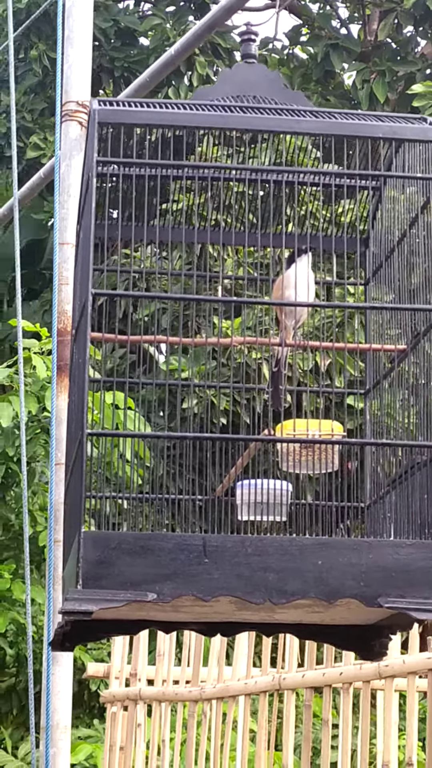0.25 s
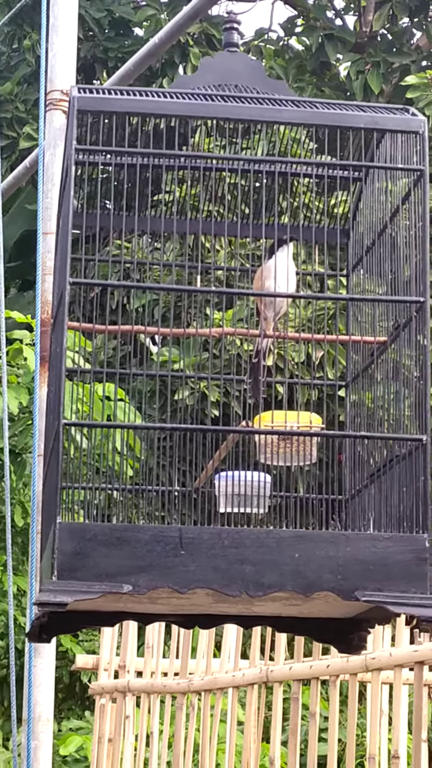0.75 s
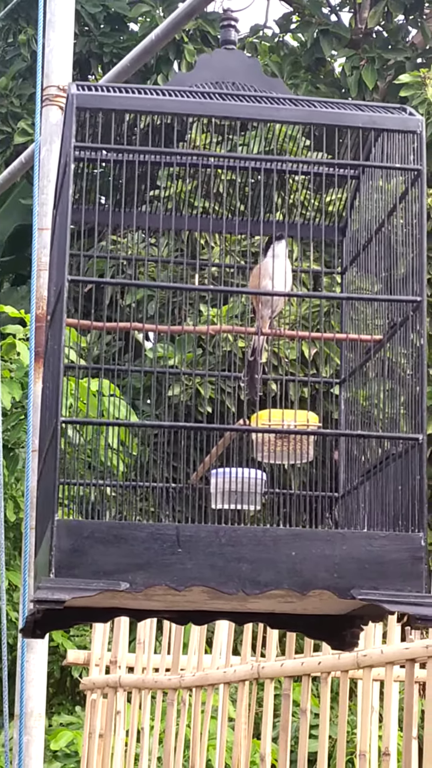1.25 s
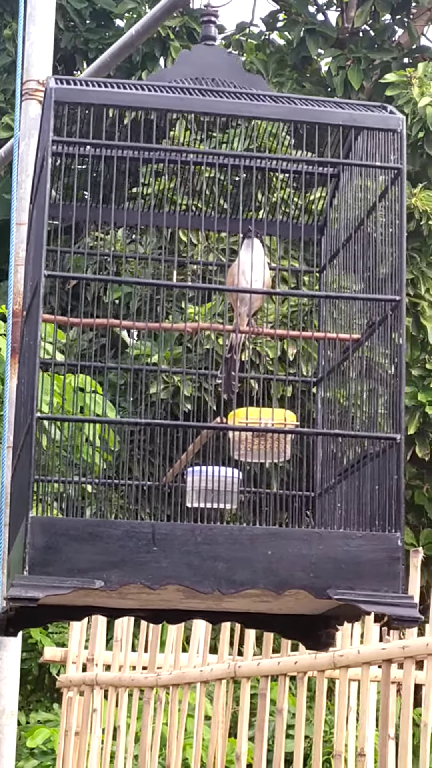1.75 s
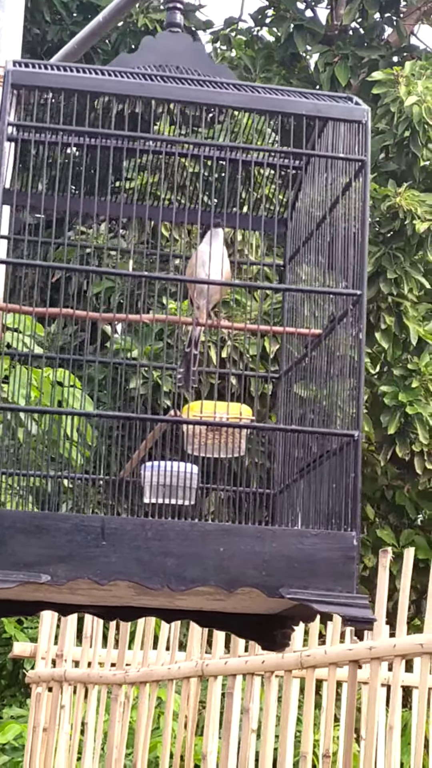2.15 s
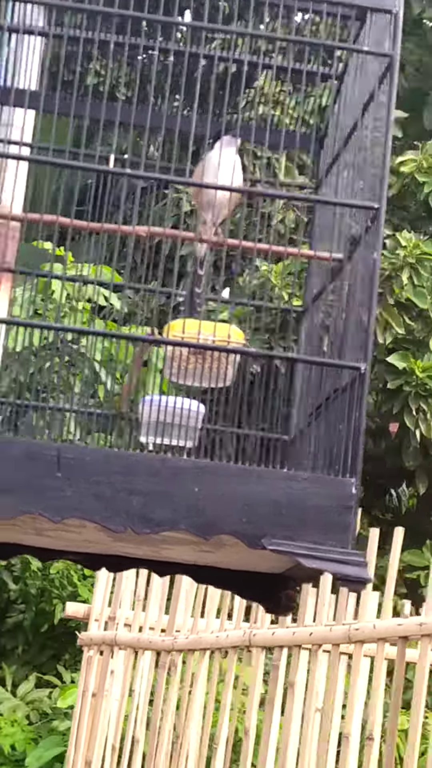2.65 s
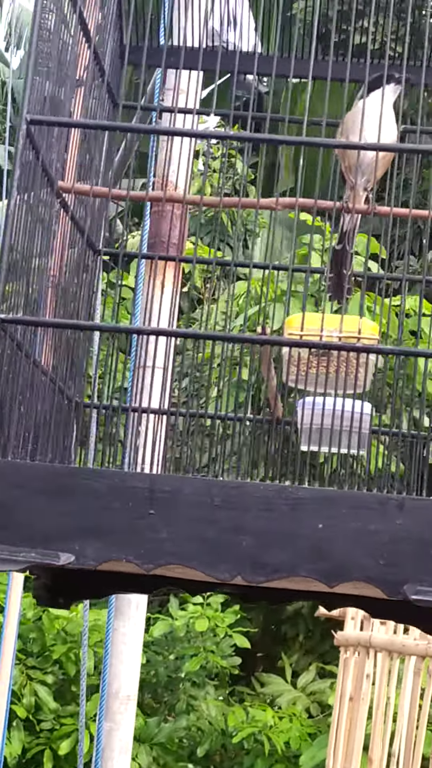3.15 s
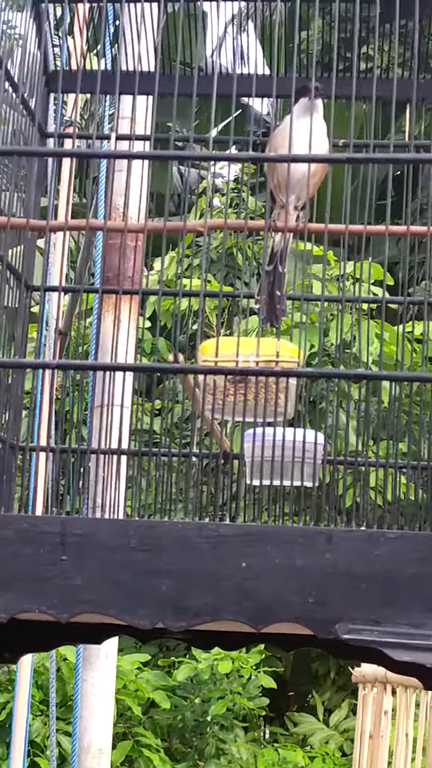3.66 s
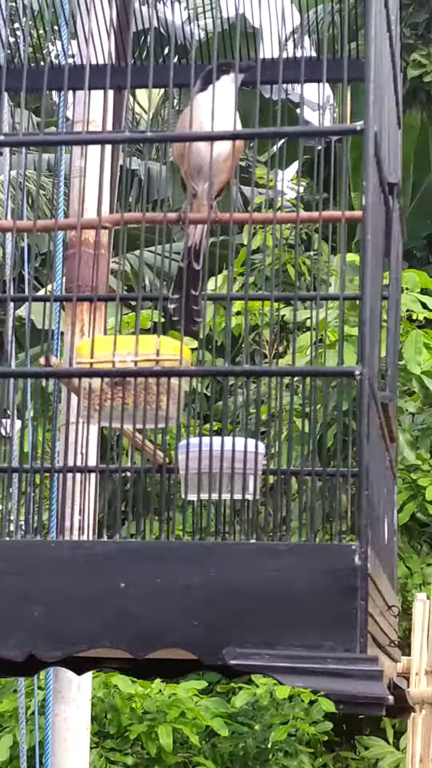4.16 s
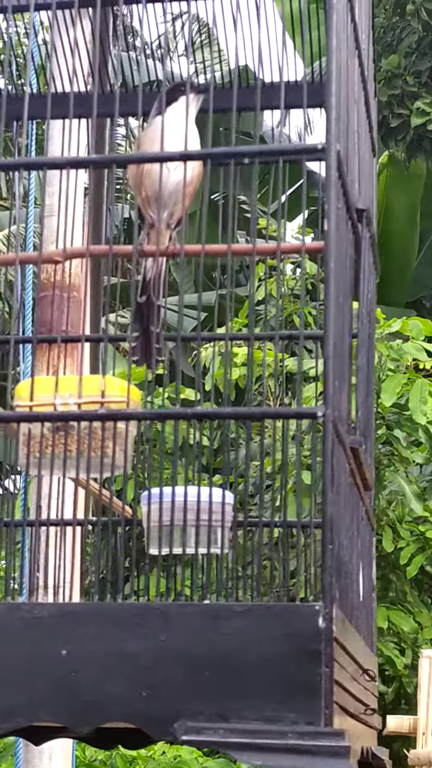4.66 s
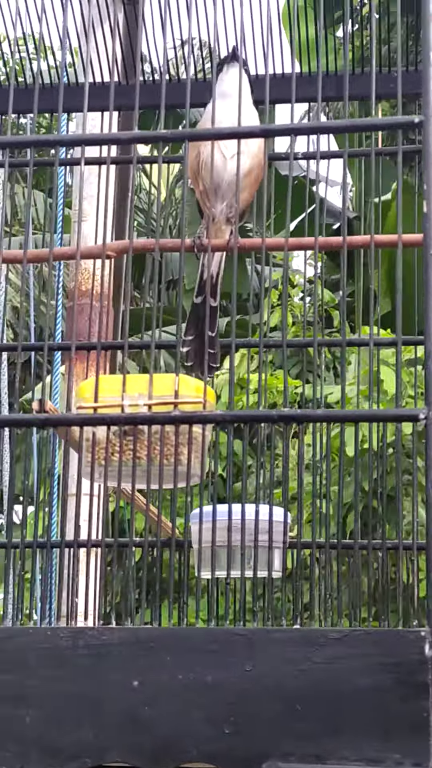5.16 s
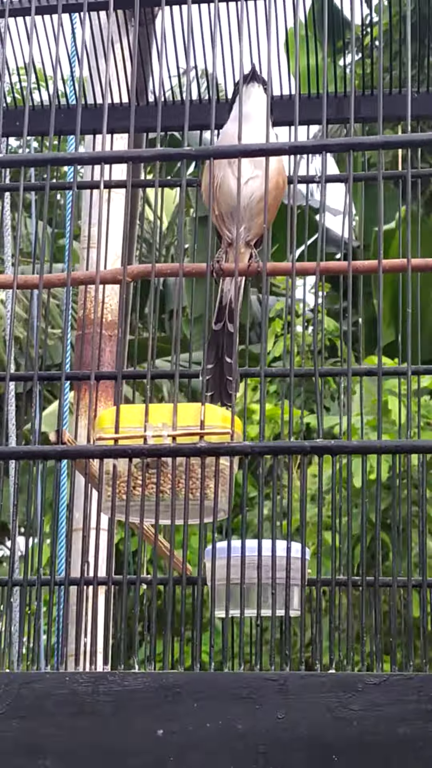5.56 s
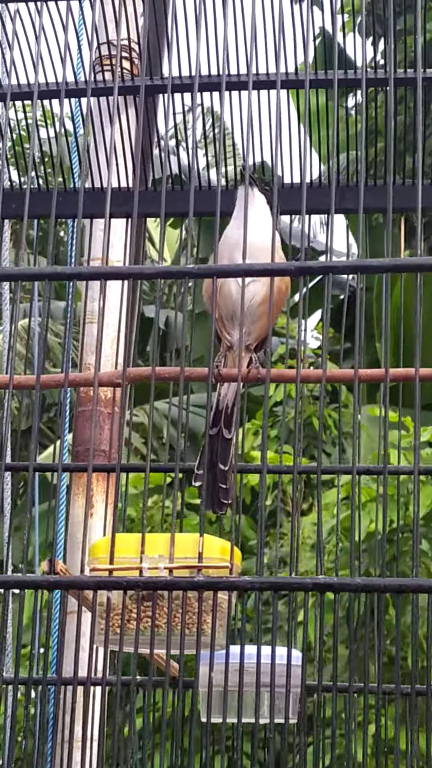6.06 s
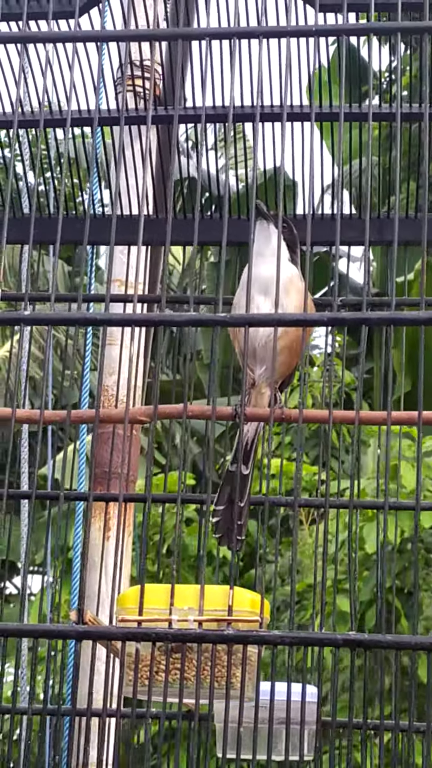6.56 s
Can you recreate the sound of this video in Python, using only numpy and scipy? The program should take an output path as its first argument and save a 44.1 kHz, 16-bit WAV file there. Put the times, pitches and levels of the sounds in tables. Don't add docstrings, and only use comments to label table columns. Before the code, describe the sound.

A caged songbird close by gives a steady run of sharp rasping chips, then buzzy rattles and falling whistles, with dry snaps over faint garden hum.

```python
import sys
import numpy as np
from scipy import signal
from scipy.fft import rfft, irfft, next_fast_len
from scipy.io import wavfile
from scipy.ndimage import uniform_filter1d

SR = 44100
rng = np.random.default_rng(int(sys.argv[2]) if len(sys.argv) > 2 else 0)


def master_out(mix):
    frames = np.transpose(np.atleast_2d(mix))
    ceiling = np.clip(frames, -1, 1)
    pcm = np.round(ceiling * 32767).astype(np.int16)
    wavfile.write(sys.argv[1], SR, pcm)


def invert_db(x):
    u = np.asarray(x, float) / 20
    return 10 ** u


N = 300321


def evened(x):
    return x / np.sqrt(np.mean(x ** 2) + 1e-20)


def read(points, hz):
    f, value = np.transpose(points)
    return np.interp(np.log(hz + 1), np.log(f + 1), value)


def add(mix, start_s, sound):
    part = mix[round(start_s * SR):][:len(sound)]
    part += sound[:len(part)]


def resonate(x, hz, width_hz):
    turn = np.exp(2j * np.pi * hz * np.arange(len(x)) / SR)
    r = np.exp(-np.pi * width_hz / SR)
    return 2 * (turn * signal.lfilter([1 - r], [1, -r], x / turn)).real


def resonate_twice(x, hz, width_hz):
    return resonate(resonate(x, hz, width_hz), hz, width_hz)


def wobble(size, hz):
    lowpass = signal.butter(4, 2 * hz / SR, output="sos")
    return evened(signal.sosfilt(lowpass, rng.standard_normal(size + 500))[500:])


# frequency in Hz, level in dB per Hz.
AIR_SPECTRUM = [(24, -36.5), (40, -2.5), (64, -4), (121, -11), (269, -20), (392, -20.5), (444, -24),
                (663, -27.5), (873, -31), (2320, -30.5), (2700, -33), (5180, -33), (7360, -37),
                (11600, -36), (16000, -45)]
# frequency in Hz, correlation from -1 to 1.
AIR_LIKENESS = [(60, 1), (180, 0.9804), (550, 0.82), (1650, 0.2358), (4970, -0.54), (15000, 0.3101)]
# frequency in Hz, left minus right in dB.
AIR_BALANCE = [(60, -0.5), (180, 1.5), (550, -2.5), (1650, 3.5), (4970, 2), (15000, 1.5)]
# frequency in Hz, width in Hz, level in dB.
ENGINES = [
    (73.3, 42, -58.5),
    (100.24, 6.7, -58),
    (125.32, 24, -62.5),
]


def air():
    hz = np.fft.rfftfreq(1024, 1 / SR)
    a, b, c, d, patches = rng.standard_normal((N // 256 + 5, 513, 5)).T
    patches = evened(uniform_filter1d(uniform_filter1d(patches, 10, 0), 16, 1))
    same = np.clip(read([(35, 1.0)] + AIR_LIKENESS, hz), -1, .9)[:, None]
    left = a + 1j * b
    right = same * left + np.sqrt(1 - same ** 2) * (c + 1j * d)
    balance = invert_db(read(AIR_BALANCE, hz) / 2)[:, None]
    level = invert_db(read(AIR_SPECTRUM, hz)[:, None] + 2.8428 * patches)
    z = np.array([left * balance, right / balance]) * level
    wash = invert_db(-56) * evened(signal.istft(z, nperseg=1024, noverlap=768)[1][:, :N])
    hum = sum(invert_db(db) * evened(resonate_twice(rng.standard_normal(N), f, width_hz)) for f, width_hz, db in ENGINES)
    return wash + hum


def glide(length_s, db, first_hz, last_hz):
    hz = np.linspace(first_hz, last_hz, round(length_s * SR))
    hz = hz * (1 + 0.01616 * wobble(len(hz), hz=57))
    return invert_db(db) * np.sin(2 * np.pi * np.cumsum(hz) / SR) * signal.windows.tukey(len(hz), .5)


# start in seconds, length in seconds, level in dB, pitch in Hz.
DOVE_COOS = [
    (.02, 0.06286, -64, 698.4),
    (.211, 0.4844, -73, 699.4),
    (.501, 0.2615, -69, 600),
    (1.81, 0.273, -71, 683),
    (2.601, 0.1224, -66, 682.9),
    (4.28, 0.4848, -73, 538.3),
    (6.486, .11, -58, 697),
    (6.767, 0.0441, -62, 675.9),
]
# middle in seconds, spread in seconds, rise over the murmur in dB.
DOVE_BOUTS = [
    (.45, .4, 12),
    (2.05, .12, 4),
    (2.67, .2, 10.5),
    (3.9, .15, 0.5),
    (6.5, .3, -7.5),
]


def doves():
    out = np.zeros(N)
    for start_s, length_s, db, hz in DOVE_COOS:
        add(out, start_s, glide(length_s, db, hz, 0.95475 * hz))
    t = np.arange(N) / SR
    bouts_db = sum(db * np.exp(-((t - s) / spread_s) ** 2) for s, spread_s, db in DOVE_BOUTS)
    murmur_db = -81 + bouts_db + 3 * wobble(N, hz=3.9)
    return out + invert_db(murmur_db) * evened(resonate_twice(rng.standard_normal(N), 660, 390))


# start in seconds, length in seconds, level in dB, first pitch in Hz, last pitch in Hz.
FAR_NOTES = [
    (0.344, 0.0992, -73, 4250, 4050),
    (0.426, 0.1561, -72, 5100, 4550),
    (0.967, 0.1808, -65.5, 4400, 4520),
    (1.117, 0.03209, -62.5, 4350, 3900),
    (4.032, 0.12102, -68, 2350, 2250),
    (4.42, 0.10005, -67, 2500, 2150),
    (5.7, 0.18, -69.5, 5150, 4450),
    (6.233, 0.03004, -68, 4250, 4450),
    (6.301, 0.091, -67, 4550, 4350),
]


def far_birds():
    out = np.zeros(N)
    for start_s, *note in FAR_NOTES:
        add(out, start_s, glide(*note))
    return out


# start in seconds, level in dB, decay length in seconds, centre in Hz.
TICK_EVENTS = [(0.484, -59, 0.01994, 1555), (0.491, -52.5, 0.01052, 300), (0.845, -46.5, 0.01187, 350.5),
               (2.797, -53.5, 0.1292, 45), (0.747, -64.5, 0.01059, 2976), (0.847, -62.5, 0.01309, 1150),
               (0.871, -58.5, 0.01088, 2500), (2.148, -58, 0.04305, 482.9), (2.626, -50.5, 0.0284, 4170),
               (2.63, -41, 0.00805, 11260), (3.788, -59.5, 0.2103, 7430), (3.295, -46.5, 0.003635, 1624),
               (3.788, -61.5, 0.1736, 935.2), (4.645, -49, 0.01456, 2000), (5.539, -39, 0.004579, 1840),
               (5.552, -47, 0.014, 3480), (5.589, -50.5, 0.0085, 1850), (5.61, -57.5, .003, 1880),
               (5.617, -56, 0.0037, 1717), (5.635, -53.5, 0.0071, 1800), (5.805, -49.5, 0.003, 2500)]


def ticks():
    out = np.zeros(N)
    for start_s, db, length_s, hz in TICK_EVENTS:
        t = np.arange(round(3 * length_s * SR)) / SR
        noise = evened(resonate(rng.standard_normal(len(t)), hz, 0.68 * hz))
        add(out, start_s, invert_db(db) * noise * np.exp(-t / length_s))
    return out


def small_sounds():
    out = doves() + far_birds() + ticks()
    return np.array([invert_db(-1.0) * np.roll(out, 9), invert_db(-5.0) * out])


# frequency in Hz, gain in dB.
BEAK_GAIN = [(1500, -5), (4000, -3.5), (7000, -1.5), (9500, -7), (10600, -10.5), (12000, 9.5),
             (14500, -3.5), (16500, -11)]


def voice(rows, overtones_db, fade=0.09):
    s, *columns = np.transpose(rows)
    t = np.arange(s[0], s[-1], 1 / SR)
    effort_db, hz, rough = (np.interp(t, s, c) for c in columns)
    rough = np.clip(rough, 0, .3)
    throb = np.cos(2 * np.pi * np.cumsum(260 * (1 + 0.32 * wobble(len(t), hz=115.77))) / SR)
    dip = (throb - .3) * (1 + 0.27 * np.tanh(wobble(len(t), hz=84.52)))
    turns = np.cumsum(hz * (1 + rough * dip + 0.0033 * wobble(len(t), hz=150.2))) / SR
    strength = invert_db(effort_db + 1.5) * (1 + np.minimum(5.9 * rough, .6) * wobble(len(t), hz=300))
    slack_db = fade * (effort_db - effort_db.max())
    stack = 0
    for k, db in enumerate(overtones_db, 1):
        level = invert_db(db + (k > 1) * slack_db + read(BEAK_GAIN, k * hz)) * (k * hz < 17000)
        stack = stack + level * np.sin(2 * np.pi * k * turns)
    return s[0], strength * stack * signal.windows.tukey(len(t), min(1, 120 / len(t)))


def curve_note(curve, rough, overtones_db):
    return voice([(*row, rough) for row in curve], overtones_db)


# time in seconds, effort in dB, pitch in Hz.
PLUNGE_CURVE = [(1.207, -37.5, 4867), (1.225, -35, 4810), (1.262, -25, 4270), (1.275, -25, 3744),
                (1.295, -34.5, 2500), (1.315, -34.5, 1897), (1.33, -49, 1579)]
UNDER_CURVE = [(1.207, -41.5, 2743), (1.222, -44.5, 3306), (1.255, -41, 3043), (1.272, -47.5, 3543)]
HOARSE_CURVE = [(1.207, -50, 2300), (1.265, -47.5, 2472), (1.3, -58, 2144)]
CLIMB_CURVE = [(1.441, -30.5, 5512), (1.449, -38.5, 4280), (1.466, -30, 4951), (1.482, -22.5, 5100),
               (1.488, -26.5, 6083), (1.515, -28.5, 6100)]
CLEAR_STACK_DB = [-1, -19.5, -23, -47, -36.5]
HOARSE_STACK_DB = [-20.5, 5, 5.5, -5, -10.5, -16]


def opening_notes():
    return [curve_note(PLUNGE_CURVE, .025, CLEAR_STACK_DB), curve_note(UNDER_CURVE, .04, CLEAR_STACK_DB),
            curve_note(HOARSE_CURVE, .14, HOARSE_STACK_DB), curve_note(CLIMB_CURVE, .075, CLEAR_STACK_DB)]


# start in seconds, peak in dB, bass in dB, bass frequency in Hz, treble in dB.
SNAP_EVENTS = [
    (1.5153, -7, -31.5, 700, -3.5),
    (2.8948, -7.5, -30.5, 276.6, -2),
    (3.6069, -6.5, -23.5, 703.2, -0.5),
    (6.3746, -8, -22.5, 700, 4.5),
]
# frequency in Hz, width in Hz, level in dB.
SNAP_MODES = [(1380.2, 890, -12), (2500, 780, -6), (5150, 1164.8, 1.5), (8402.7, 2200, -9),
              (11601, 2100, -7.5), (14563, 2500, -16.5)]


def snaps():
    out, t = np.zeros((2, N)), np.arange(600) / SR
    for start_s, peak_db, bass_db, bass_hz, treble_db in SNAP_EVENTS:
        shared, *own = rng.standard_normal((3, len(t)))
        push = np.sin(2 * np.pi * bass_hz * t) * np.exp(-t * bass_hz / 0.22)
        for port, late_s, noise in zip(out, (.0003, 0), own):
            cluster = np.exp(-((t - .0009) / 0.00028988) ** 2)
            cracks = (t == t[30]) + (0.32557 * shared + 0.2544 * noise) * cluster
            ring = invert_db(-13.5 + treble_db / 2) * evened(cracks)
            for k, (hz, width_hz, db) in enumerate(SNAP_MODES):
                mode_db = db - 2.5 * (2000 < hz < 3500) + treble_db * (hz > 7000)
                ring += (-1) ** k * invert_db(mode_db) * evened(resonate_twice(cracks, hz, width_hz))
            add(port, start_s + late_s, invert_db(peak_db + 9.5) * (ring / abs(ring).max() + invert_db(bass_db) * push))
    return out


# start in seconds, effort in dB, delay of the trough in seconds, trough in Hz, upswing in dB.
CHIP_EVENTS = [
    (1.796, -21.5, 0.06047, 4221, -8),
    (2.082, -22.5, 0.06289, 4065, -6.5),
    (2.38, -19.5, 0.06057, 4404, -7),
    (2.688, -20.5, 0.063007, 4329, -5.5),
    (3.004, -20, 0.063574, 4566, -3.5),
    (3.312, -19.5, 0.067215, 4369, -3),
    (3.625, -19, 0.066904, 4309, -5.5),
    (3.952, -19, 0.069525, 4257, -5),
]
RASP_STACK_DB = [-35.5, -3.5, -2, 0.5, -2, -1.5, -1, -27, -8, -22, -28, -14]
SLIDE_STACK_DB = [-4, -16.5, -28.5]


def chip(s, db, trough_s, trough_hz, up_db):
    rasp_db, rasp_hz = db - 16.5, 974.2
    rasp = [(s, rasp_db, 1.4 * rasp_hz, .03),
            (s + 0.0053, rasp_db, rasp_hz, .02),
            (s + 0.014, rasp_db - 8.5, 1.4 * rasp_hz, .03),
            (s + 0.033, rasp_db - 11.0, 1.5 * rasp_hz, .05)]
    crest_hz, top_hz, rough = 5306.7, 6100, .03
    low = s + trough_s
    crest, top = low - .042, low + .015
    slide = [(crest - .005, db - 10.5, crest_hz, rough),
             (crest, db - 3.5, crest_hz, rough),
             (low - .024, db, .45 * crest_hz + .55 * trough_hz + 60, 0.45 * rough),
             (low, db - 4.5, trough_hz, 0.6 * rough),
             (top - .007, db + up_db, .87 * top_hz, 1.9 * rough),
             (top, db + up_db - .5, top_hz, rough),
             (top + 0.02322, db + up_db - 18.5, .99 * top_hz, rough)]
    return [voice(rasp, RASP_STACK_DB), voice(slide, SLIDE_STACK_DB)]


def slur(s, db, top_hz, rest_hz, hold_s, flat, scoop_s, length, sag_hz_per_s, start_db, scooped_db, swell_s,
         fade_db, fade_s, release_s, release_db, last_push_db, rough):
    t = np.arange(0, length, .002)
    scoop = flat + (1 - flat) * np.sin(np.pi / 2 * np.minimum(t / scoop_s, 1))
    sagging_hz = top_hz - sag_hz_per_s * np.maximum(t - scoop_s - hold_s, 0)
    hz = scoop * np.maximum(sagging_hz, rest_hz - 1100 * (t - .27))
    effort_db = np.interp(t, [0, 0.6041 * scoop_s, swell_s, length - release_s, length],
                          [start_db, scooped_db, 0, 0, release_db])
    effort_db += fade_db * (1 - np.exp(-np.maximum(t - swell_s, 0) / fade_s))
    effort_db += last_push_db * np.exp(-((t - length + release_s + .02) / .035) ** 2)
    return np.transpose([s + t, db + effort_db, hz, rough + 0 * t])


# start in seconds, peak effort in dB, top in Hz, resting pitch in Hz, hold at the top in s.
RATTLE_EVENTS = [
    (4.874, -23, 3674, 2888, .045),
    (6.749, -20.5, 3771, 2850, .045),
]
RATTLE_SLUR = dict(flat=.67, scoop_s=0.044, length=0.29502, sag_hz_per_s=6100, start_db=-42, scooped_db=-17, swell_s=0.0866, fade_db=-16.5, fade_s=0.12076, release_s=0.025, release_db=-5, last_push_db=1.5, rough=.057)
RATTLE_STACK_DB = [4, -18, -24, -40, -28.5]


def rattles():
    return [voice(slur(*row, **RATTLE_SLUR), RATTLE_STACK_DB) for row in RATTLE_EVENTS]


# time in seconds, effort in dB, pitch in Hz.
PEEP_CURVE = [(5.25, -56.5, 2427), (5.265, -34, 2433), (5.293, -55, 2280)]
SOFT_CURVE = [(5.84, -43.5, 964.1), (5.855, -30.5, 1151), (5.875, -31, 1137), (5.93, -50, 816.4)]
PEEP_STACK_DB = [-4, -33, -52]
SOFT_STACK_DB = [-33, -1, -39.5, -33, -41.5, -41.5]


def soft_notes():
    return [curve_note(PEEP_CURVE, .004, PEEP_STACK_DB), curve_note(SOFT_CURVE, .006, SOFT_STACK_DB)]


# start in seconds, peak effort in dB, top in Hz, resting pitch in Hz, hold at the top in s.
WHISTLE_EVENTS = [
    (5.397, -14, 3952, 2971, 0.0039),
    (5.998, -18, 3771, 2380, .035),
]
WHISTLE_SLUR = dict(flat=.83, scoop_s=.03, length=0.36894, sag_hz_per_s=4700, start_db=-35.5, scooped_db=-10.5, swell_s=0.077407, fade_db=-27, fade_s=0.12148, release_s=0.083, release_db=-13, last_push_db=6, rough=0.0053)
WHISTLE_STACK_DB = [0.5, -22.5, -26, -52.5]


def whistles():
    return [voice(slur(*row, **WHISTLE_SLUR), WHISTLE_STACK_DB, fade=0.46) for row in WHISTLE_EVENTS]


def bird():
    notes = opening_notes()
    for row in CHIP_EVENTS:
        notes += chip(*row)
    notes += rattles() + soft_notes() + whistles()
    out = np.zeros(N)
    for start_s, sound in notes:
        add(out, start_s, sound)
    return out


def ports(x, balance):
    lag_s, turn_rad = 0.00033209, 3.1404
    size = next_fast_len(N + 999)
    hz = np.fft.rfftfreq(size, 1 / SR)
    half = invert_db(read(balance, hz) / 2) * np.exp(.5j * (turn_rad - 2 * np.pi * hz * lag_s))
    return irfft(rfft(x, size) * np.array([half, 1 / half]), size)[:, :N]


# frequency in Hz, time to fall 60 dB in seconds.
GARDEN_T60 = [(200, 0.027), (1000, 0.033), (2500, 0.32683), (5000, 0.26998), (9000, 0.29), (15000, 0.17)]


def garden(x, walls, tail_db):
    taps = np.zeros((2, SR // 2))
    at = np.arange(100, SR // 2 - 20, 20) + rng.integers(0, 20, (2, (SR // 2 - 101) // 20))
    np.put_along_axis(taps, at, rng.choice([-1., 1.], at.shape), 1)
    hz, t, z = signal.stft(taps, SR, nperseg=256)
    decay = invert_db(-60 * t / read(GARDEN_T60, hz)[:, None])
    tail = signal.istft(z * decay, SR, nperseg=256)[1]
    tail *= invert_db(tail_db) / np.linalg.norm(tail[0])
    for s, db in walls:
        at = np.round(s * SR * rng.uniform(.93, 1.07, 2)).astype(int)
        tail[[0, 1], at] += invert_db(db) * rng.choice([-1, 1], 2)
    return x + signal.fftconvolve(x, tail, axes=1)[:, :N]


# frequency in Hz, left minus right in dB.
EARLY_BALANCE = [(2100, 5), (4400, 2), (6000, 0), (12000, -0.5)]
LATE_BALANCE = [(2300, 7.2), (3900, 5.7066), (7000, 1), (15000, 2)]
# delay in seconds, level in dB.
WALL_ECHOES = [(.0045, 2), (.0068, -7.5), (0.0119, -21), (0.0144, -12.5), (.021, -19.5)]
SNAP_ECHOES = [(.0045, -24), (.0068, -18), (.0095, -22)]


def scene():
    song, moved = bird(), np.arange(N) > 4.5 * SR
    heard = ports(song * ~moved, EARLY_BALANCE) + ports(song * moved, LATE_BALANCE)
    near = garden(heard, WALL_ECHOES, tail_db=-7.5) + garden(snaps(), SNAP_ECHOES, tail_db=-18)
    return near + garden(small_sounds(), WALL_ECHOES, tail_db=-2.5) + air()


def starve(x, gap_db, spread_db, slope_db, ragged_db):
    z = signal.stft(x, nperseg=2048, noverlap=1024, window="cosine")[2]
    bands = (abs(z[:, :1024]) ** 2).reshape(2, 64, 16, -1).sum(2)
    index = np.arange(64)[:, None]
    reach = invert_db(-2 * spread_db * np.minimum(abs(index - index.T), 14)) * (index.T > 4)
    masker = (reach[None, :, :, None] * bands[:, None]).max(2)
    allowed_db = gap_db + slope_db * np.maximum(index - 36, 0)
    allowed_db = allowed_db + ragged_db * rng.standard_normal(bands.shape[1:])
    kept = (bands > masker * invert_db(2 * allowed_db)) | (index < 9)
    z[:, :1024] *= np.repeat(kept, 16, axis=1)
    return signal.istft(z, nperseg=2048, noverlap=1024, window="cosine")[1][:, :N]


def band_limit(x):
    return signal.sosfilt(signal.butter(12, 16830, fs=SR, output="sos"), x)


def record(dry):
    bass_cut = signal.butter(4, 43, "high", fs=SR, output="sos")
    top_cut = signal.ellip(8, .5, 70, 16500, fs=SR, output="sos")
    heard = signal.sosfilt(np.vstack([bass_cut, top_cut]), .74 * np.tanh(dry / .74))
    heard = starve(heard, gap_db=-28, spread_db=1.55, slope_db=1, ragged_db=3)
    return band_limit(heard)


dry = scene()
out = record(dry)
master_out(out)
```